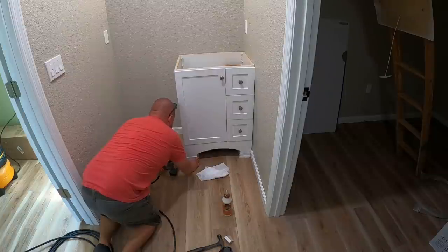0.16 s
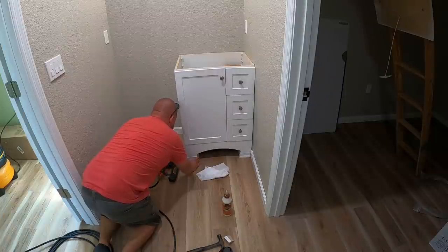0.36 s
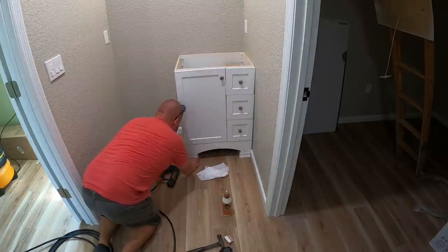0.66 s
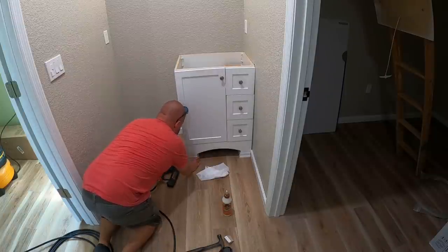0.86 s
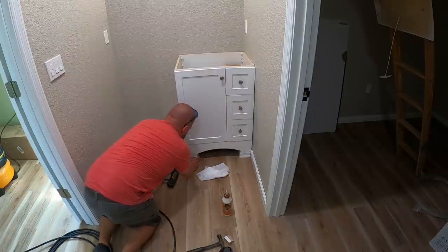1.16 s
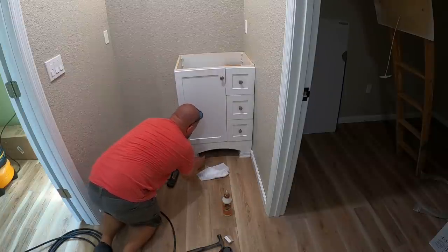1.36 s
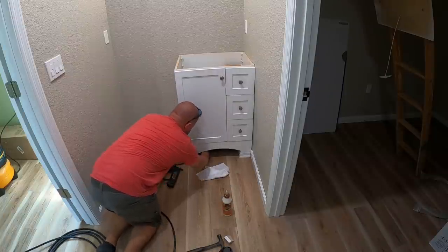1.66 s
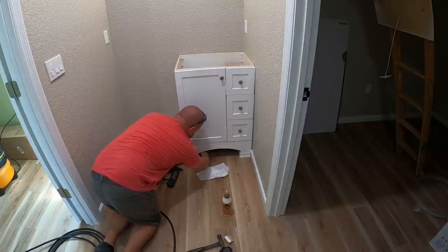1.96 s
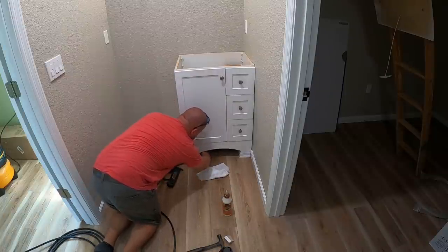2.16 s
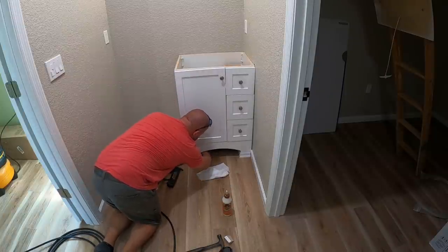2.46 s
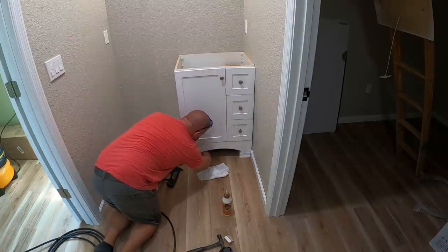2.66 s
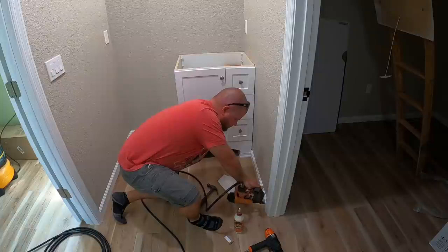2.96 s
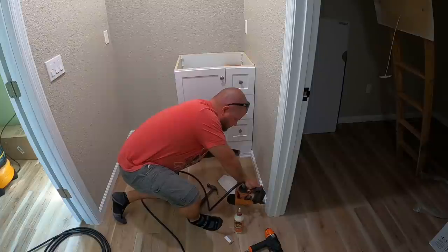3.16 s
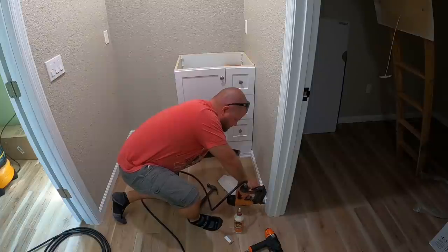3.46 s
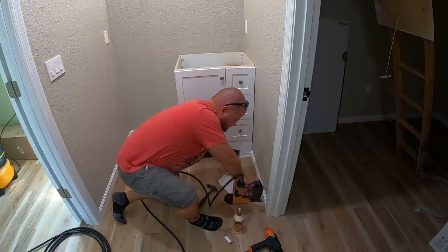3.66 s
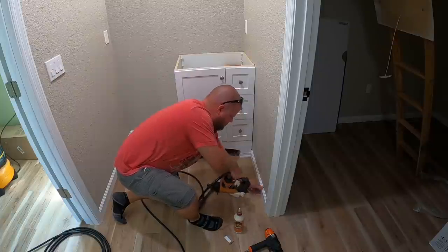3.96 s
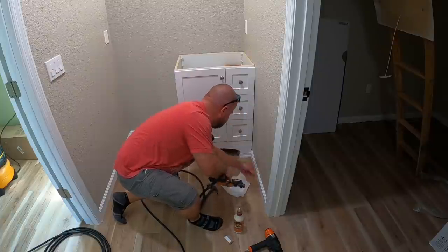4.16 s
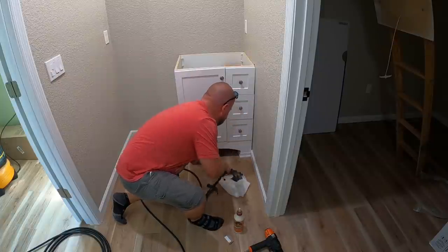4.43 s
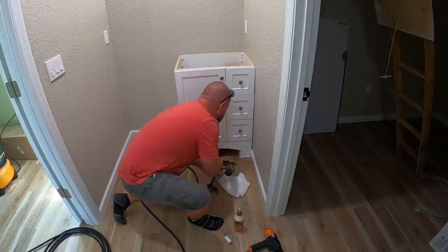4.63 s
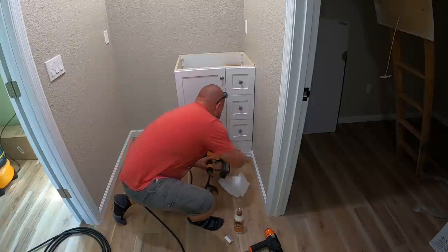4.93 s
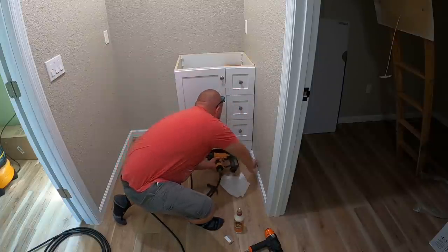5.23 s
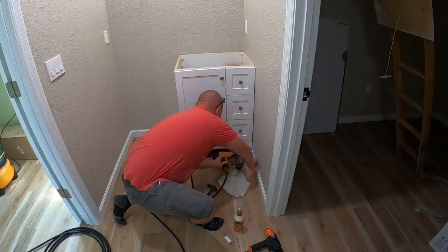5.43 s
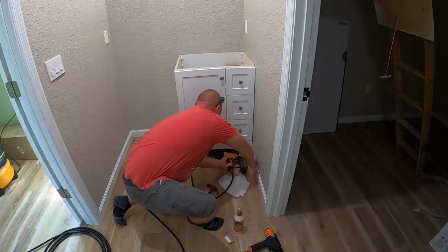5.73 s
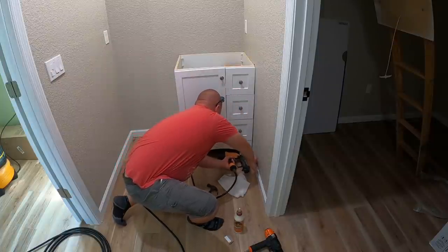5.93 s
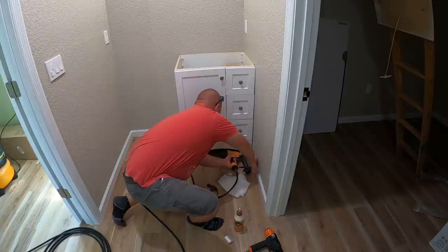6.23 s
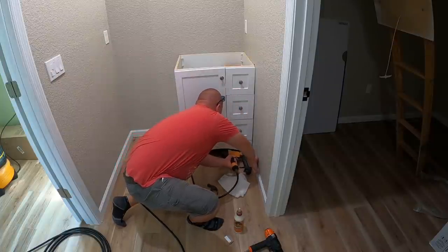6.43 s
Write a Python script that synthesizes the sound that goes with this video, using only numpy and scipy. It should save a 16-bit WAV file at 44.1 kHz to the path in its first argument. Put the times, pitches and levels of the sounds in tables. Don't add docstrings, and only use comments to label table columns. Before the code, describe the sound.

After an earlier shot's dying echo, trim rattles onto floorboards, faint rubbing and taps follow, then an air nailer bangs loudly with an exhaust hiss.

```python
import sys
import numpy as np
from scipy import signal
from scipy.fft import rfft, irfft
from scipy.io import wavfile
from scipy.ndimage import uniform_filter1d

SR = 44100
rng = np.random.default_rng(int(sys.argv[2]) if len(sys.argv) > 2 else 0)


def to_wav(s):
    ch = np.atleast_2d(s).T
    pcm = np.round(np.clip(ch, -1, 1) * 32767)
    wavfile.write(sys.argv[1], SR, pcm.astype(np.int16))


def gain_from_decibels(decibels):
    exponent = np.asarray(decibels, float) / 20
    return 10 ** exponent


N = 290619
LEAD = SR // 2
M = N + LEAD

# start_s, body_db, metal_db, crack_db, crack_t60_s
BLOWS = [
    (3.488, -42, -38.5, -28.5, 0.023),
    (3.5316, -18.5, -30, -16.5, 0.045),
    (3.555, -22, -16.5, -15.5, 0.22),
    (3.5599, -20, -30.5, -30, .03),
    (3.62, -34, -24, -28.5, .012),
    (3.641, -28, -28, -19.5, 0.025),
    (3.670, -26, -27, -23.5, 0.055),
]
# pitch_hz, level_db, t60_s
BODY_MODES = [(72, -9, 0.1), (100, -6, 0.12), (147, 0.5, 0.087), (178, 2, 0.09), (217, 0.5, 0.09),
              (297, -7, 0.15), (369, -14, 0.08), (403, -14.5, .08), (470, -13.5, .06), (557, -17.5, .05),
              (618, -15.5, 0.05), (693, -14, .06), (825, -11.5, 0.06), (964, -9, .06)]
# pitch_hz, level_db, t60_s
METAL_MODES = [(1254, -14, .05), (1703, -4.5, 0.068), (1990, -9, .03), (2223, -6, 0.06),
               (2293, -4.5, 0.036), (2700, -9.5, 0.045), (3660, -6, 0.036), (5000, -10.5, .015),
               (6270, -3.5, 0.026), (9200, -4.5, 0.013)]
# freq_hz, density_db
BLOW_CRACK = [(180, -31), (300, 3.5), (912, -6.5), (1340, -16.5), (1660, -8), (1800, -10), (2230, -4),
              (2640, -11.5), (6360, -11.5), (15800, -28)]
# freq_hz, density_db
JET = [(590, -32.5), (1000, -8.5), (1740, -16), (2190, -10), (2350, -14.5), (3250, -7.5), (3820, -3.5),
       (4390, -6.5), (9750, -8.5), (15800, -17)]
# pitch_hz, width_hz, level_db
PORTS = [(2220, 40, -5), (3920, 30, -1.5), (4710, 46, -2.5), (6370, 60, -10), (6970, 35, -6),
         (7860, 60, -8.5), (9100, 40, -12), (10200, 90, -9.5)]
# start_s, level_db, rise_s, hold_s, t60_s
INLET = [
    (3.486, -43, .002, 0.0045, 0.069),
    (3.523, -20.5, 0.011, 0.0043, 0.043),
    (3.543, -32.5, 0.0069, 0.012, 0.034),
]
# start_s, level_db, rise_s, hold_s, t60_s
EXHAUST = [
    (3.637, -21.5, 0.0036, 0.028, 0.089),
    (3.677, -29, 0.0036, 0.012, 0.42),
]
INLET_WHISTLE_DB, EXHAUST_WHISTLE_DB = -11.5, 3
EARLIER_S, EARLIER_DB, EARLIER_BODY_DB, EARLIER_PORTS_DB = 3.8, -1.5, -9, -12.5

# start_s, peak_db, ring_hz, crack_over_ring_db
STRIP_KNOCKS = [(0.355, -11, 916, 0.5), (0.362, -9.5, 796, -0.5), (0.383, -37, 790, 0),
                (0.409, -15.5, 899, 1), (0.415, -19.5, 870, 0), (0.444, -18, 832, -1),
                (0.457, -24.5, 850, -3), (0.47, -27, 880, -2), (0.501, -31, 840, -9), (.515, -36, 830, -4),
                (0.529, -31, 824, -2), (0.555, -35.5, 710, 5), (0.598, -26, 1107, 2.5),
                (0.6125, -23.5, 865, 0), (0.616, -20, 800, 2), (0.63, -34, 905, -10), (.647, -40, 910, 7),
                (0.663, -35, 872, -2), (0.678, -32, 814, -2), (.695, -36, 900, 1), (0.716, -29, 890, -7),
                (.74, -39, 840, 0), (0.779, -28.5, 862, -9), (6.385, -24, 868, -13), (6.398, -34, 610, -4)]
# start_s, peak_db, ring_hz, crack_over_ring_db
TAPS = [(1.074, -42, 557, -8), (1.185, -53.5, 570, -20), (1.253, -46, 580, -20), (1.277, -50, 570, -18),
        (1.39, -47.5, 957, -13.5), (1.623, -38, 470, -26.5), (1.638, -45, 446, -18), (1.652, -46, 523, -20),
        (1.713, -41, 525, -20), (1.726, -44.5, 527, -20), (2.074, -53.5, 519, -13.5),
        (2.245, -48.5, 540, -12), (2.26, -41.5, 521, -9), (2.86, -59.5, 576, -6), (3.03, -65.5, 932, -16),
        (3.15, -62.5, 600, -8), (3.376, -55, 338.6, -9), (3.488, -29.5, 523, -15),
        (4.712, -49.5, 900, -5.5), (4.76, -47.5, 595, -13), (4.809, -44, 910, -13),
        (4.859, -46, 926, -12.5), (4.913, -39, 978, -9.5), (5.492, -57.5, 491, -13), (5.953, -44, 800, -20),
        (5.955, -48.5, 518, -23.5), (6.419, -46, 873, -12), (6.454, -43, 788, -10),
        (6.571, -52.5, 980, -10)]
# ratio_to_ring, level_db
WOOD_MODES = [(.36, -21.5), (.56, -7.5), (0.72, -11.5), (0.881, -3), (0.998, 3), (1.13, -3), (1.271, -17),
              (1.9, -10.5), (2.02, -9), (2.3, -11), (2.9, -13.5)]
# start_s, peak_db, pitch_hz, t60_s
THUMPS = [
    (-0.054, -29, 78, 0.37),
    (-.05, -39.5, 128.7, 0.32),
    (1.623, -41.5, 149.6, 0.26),
    (3.197, -59, 205, .06),
    (3.641, -24.5, 78.4, 0.098),
    (4.109, -55.5, 164, 0.15),
    (5.266, -39, 193.5, 0.13),
    (5.954, -46, 177, 0.08),
    (6.386, -55, 167, 0.32),
]
# start_s, peak_db, centre_hz
TICKS = [(1.076, -61, 6950), (1.3023, -36.5, 4200), (1.384, -41, 4800), (1.388, -51, 9000),
         (1.393, -44, 6500), (1.8944, -62, 11500), (2.4294, -63.5, 10500), (2.858, -66, 2140),
         (3.1497, -58.5, 2103), (3.22, -62, 2350), (3.309, -68.5, 4200), (3.376, -57.5, 3200),
         (5.2696, -56, 4610), (5.4298, -56.5, 2487)]

# peak_s, rise_s, fall_s, swish_db, dull_over_swish_db
DRAGS = [(0.699, .08, 0.14, -59, 8.5), (.95, 0.16, 0.06, -62.5, -17), (1.2, 0.063, 0.28, -63, -0.5),
         (1.38, 0.13, 0.079, -59.5, -6.5), (1.69, 0.16, 0.14, -54, -8), (2.1, 0.26, 0.17, -67.5, -5.5),
         (2.45, 0.18, 0.11, -71, -10), (2.75, 0.14, 0.046, -75, -9), (4.33, .2, 0.27, -61, -11.5),
         (4.58, .12, 0.16, -70, 4.5), (4.73, 0.089, 0.119, -60.5, 1), (4.9, 0.19, 0.13, -55.5, 2.5),
         (5.13, 0.2, 0.091, -61.5, -3), (5.45, 0.37, 0.088, -71, -1), (5.8, 0.3, 0.17, -76, -2.5),
         (6.07, 0.078, 0.083, -65, -4), (6.52, 0.037, 0.35, -77, 6)]
# freq_hz, density_db
RUB_DULL = [(150, -53.5), (250, -26.5), (429, -13.5), (493, -0.5), (795, -4), (988, -2.5), (2000, -10),
            (2600, -27.5), (4400, -120)]
# freq_hz, density_db
RUB_BRIGHT = [(760, -27), (1300, -10.5), (2070, -4.5), (2300, -1), (2820, -3), (4040, -0.5), (4990, -3),
              (5510, -3.5), (8000, -9), (10400, -32), (17600, -120)]
# freq_hz, density_db
RUB_TOP = [(4120, -26.5), (7000, -6.5), (8920, 1), (11100, -3.5), (13800, -7), (15800, -17.5)]
STROKE_ROUND, TOP_DB, TOP_PER_WEIGHT = 1.4, -10, -0.077
LEAK_S, LEAK_DB, LEAK_T60_S, LEAK_DULL_DB, LEAK_TOP_DB = 3.88, -51.5, 2.65, -4.5, -17.5
LEAK_HZ, LEAK_WIDTH_HZ, LEAK_RING_DB = 3960, 1100, -2

# time_s, pitch_hz, level_db
SLIDES = [
    [(1.13, 6600, -90), (1.17, 8200, -81), (1.21, 8900, -80), (1.26, 10100, -76), (1.3, 9000, -78),
     (1.33, 8200, -92)],
    [(1.11, 6200, -90), (1.17, 12500, -82), (1.23, 14900, -81), (1.3, 15500, -82), (1.345, 13500, -81),
     (1.39, 14300, -88)],
    [(1.385, 11700, -90), (1.41, 11200, -80), (1.47, 10300, -78), (1.52, 11300, -81), (1.56, 12600, -92)],
    [(1.5, 8500, -90), (1.53, 9400, -78), (1.6, 12300, -79), (1.65, 13200, -79), (1.7, 14500, -76),
     (1.75, 13300, -79), (1.83, 8800, -81), (1.86, 7500, -92)],
    [(4.96, 10300, -95), (5.0, 9900, -80), (5.1, 9800, -79), (5.17, 10000, -81), (5.23, 7000, -86)],
    [(5.32, 10900, -96), (5.43, 11900, -87), (5.5, 10000, -95)],
    [(6.49, 10000, -95), (6.59, 12000, -90)],
]
# pitch_ratio, level_db
THREADS = [
    [(.82, -5), (1, 2), (1.4, -3)],
    [(1, 0)],
    [(.8, -4), (1, 0), (1.14, -2), (1.26, 1)],
    [(.72, -7), (.87, -4), (1, 2), (1.3, -5)],
    [(.83, -4), (1, 2), (1.17, -5), (1.35, -1)],
    [(.9, -4), (1, 1)],
    [(.85, -4), (1, 1), (1.1, -3)],
]
# start_s, stop_s, start_db, stop_db
HOSE_PULLS = [
    (0.797, 1.005, -70, -71),
    (2.003, 2.801, -77, -81.5),
    (4.898, 5.203, -58.5, -65),
    (5.217, 5.503, -77, -82.5),
    (5.741, 6.142, -84.5, -82.5),
    (6.493, 6.598, -73.5, -70.5),
]
# pitch_hz, width_hz, level_db
HOSE_WALL = [(2350, 73, 0), (3100, 59, 1.5), (3550, 33, -3.5), (4200, 58, -7), (4700, 51, 2)]
HOSE_START_S, HOSE_STOP_S = 0.041, 0.012
# time_s, pitch_hz, level_db
GROAN = [(1.92, 154, -82), (1.955, 143.4, -64.5), (2.02, 143.6, -67), (2.07, 142, -59), (2.11, 140, -70),
         (2.16, 138, -61), (2.21, 138.3, -66), (2.256, 142, -56), (2.315, 133, -72), (2.35, 128.4, -91)]

# freq_hz, density_db
RUMBLE = [(15, -55.5), (25, -27), (43, -7.5), (70, -2), (91, -0.5), (114, -9.5), (162, -0.5), (194, -8.5),
          (253, -14), (303, -4), (390, -13), (424, -12), (584, -14.5), (700, -31), (910, -58.5),
          (1540, -120)]
# time_s, level_db
RUMBLE_LEVEL = [(0.3, -68), (1.2, -68), (2.1, -63), (3.2, -69.5), (4.2, -74.5), (5.1, -65), (5.7, -68.5),
                (6.59, -70)]
# peak_s, level_db
SHUDDERS = [
    (0.0, -43.5),
    (.6, -60),
    (3.66, -52),
]
SHUDDER_RISE_S, SHUDDER_FALL_S = 0.09, 0.049
# freq_hz, density_db
HISS = [(240, -29), (400, -2.5), (536, -8.5), (635, -6.5), (707, -8.5), (1010, -9.5), (1230, -18),
        (4410, -22), (15800, -32.5)]
HISS_DB = -76.5

# freq_hz, t60_s
CLOSET_T60 = [(50, 0.45), (200, 0.25), (700, 0.4), (2000, .4), (5000, 0.38), (12000, 0.09)]
# freq_hz, level_db
CLOSET_COLOUR = [(50, -6), (250, -4.5), (500, -1.5), (1000, -0.5), (12000, 0)]
# freq_hz, t60_s
HALL_T60 = [(50, 0.91), (200, 0.2), (700, 1.364), (2000, 1.4), (4000, 1.6), (7000, 1.2), (12000, 0.23)]
# freq_hz, level_db
HALL_COLOUR = [(50, -3.5), (250, -1.5), (600, 2), (1250, -2), (1800, 1), (2800, -8), (4000, 1),
               (6000, -0.5), (12000, 0)]
ECHO_EDGES_HZ = 22 * 2 ** np.arange(0, 9.6, .5)


def shot(shift_s, level_db, body_shift_db, ports_db):
    out, t = np.zeros(M), np.arange(SR // 3) / SR
    for s, body_db, metal_db, crack_db, crack_t60 in BLOWS:
        body = [(hz, db + body_db + body_shift_db + rng.normal(0, 2.1), t60) for hz, db, t60 in BODY_MODES]
        metal = [(hz, db + metal_db + rng.normal(0, 2.1), t60) for hz, db, t60 in METAL_MODES]
        crack = gain_from_decibels(crack_db - 60 * t / crack_t60) * coloured(BLOW_CRACK, len(t))
        add(out, s - shift_s, modes(body, soft_s=0.0015) + modes(metal, soft_s=0.000058) + crack)
    for puffs, whistle_db in [(INLET, INLET_WHISTLE_DB), (EXHAUST, EXHAUST_WHISTLE_DB)]:
        for s, db, rise, hold, t60 in puffs:
            add(out, s - shift_s, gain_from_decibels(db) * air_puff(t, rise, hold, t60, whistle_db + ports_db))
    return gain_from_decibels(level_db) * out


def air_puff(t, rise, hold, t60, whistle_db):
    jet = coloured(JET, len(t))
    whistle = sum(gain_from_decibels(db) * resonate(jet, hz, 5 * width) for hz, width, db in PORTS)
    shape = np.minimum(t / rise, 1) ** 2 * gain_from_decibels(-60 * np.maximum(t - rise - hold, 0) / t60)
    return shape * rms_one(jet + gain_from_decibels(whistle_db) * whistle)


def knocks(rows, chatter_s, t60, bright, bright_per_db, upper_db, crack_t60):
    out, t = np.zeros(M), np.arange(SR // 8) / SR
    luck = rng.standard_normal((len(rows), 3, len(WOOD_MODES)))
    grit = filtered(rng.standard_normal((len(rows), len(t))), 1250, "high")
    for (s, db, hz, crack_db), (loud, tune, late), noise in zip(rows, luck, grit):
        for (ratio, mode_db), a, b, c in zip(WOOD_MODES, loud, tune, late):
            level_db = db - 4.5 + mode_db + 1.5 * a
            level_db += (upper_db + 0.92 * crack_db) * (ratio > 1.5)
            mode = (hz * ratio * (1 + 0.029 * b), level_db, t60 / ratio ** 0.24)
            add(out, s - chatter_s * (1 - abs(c)), modes([mode], soft_s=1.1 * chatter_s))
        edge_hz = 1000 * 2 ** np.clip(bright + bright_per_db * db, 0, 4)
        slow = filtered(noise, min(.6 * edge_hz, 17000), "low")
        fast = filtered(noise, min(1.6 * edge_hz, 17000), "low")
        crack = gain_from_decibels(-60 * t / crack_t60) * slow + gain_from_decibels(-12 - 60 * t / (.35 * crack_t60)) * fast
        onset = np.minimum(t / (2 * chatter_s), 1)
        add(out, s - chatter_s, gain_from_decibels(db + crack_db + 1.5) * onset * crack)
    return out


def thumps():
    out = np.zeros(M)
    for s, db, hz, t60 in THUMPS:
        rows = [(hz, db, t60), (1.25 * hz, db - 6.5, t60), (1.9 * hz, db - 6.0, .5 * t60)]
        add(out, s, modes(rows, soft_s=0.0049))
    return out


def ticks():
    out, t = np.zeros(M), np.arange(SR // 20) / SR
    for s, db, hz in TICKS:
        snap = rms_one(resonate(rng.standard_normal(len(t)), hz, 0.33 * hz))
        add(out, s, gain_from_decibels(db - 7.0 - 60 * t / 0.02) * snap)
    return out


def cloth_and_leak():
    peak, rise, fall, db, weight = np.transpose(DRAGS)
    since = clock() - LEAK_S
    leak = gain_from_decibels(LEAK_DB - 60 * since / LEAK_T60_S) * np.clip(since / 0.059 + 1, 0, 1)
    port = resonate(rng.standard_normal(M), LEAK_HZ, LEAK_WIDTH_HZ)
    out = gain_from_decibels(LEAK_RING_DB) * leak * rms_one(resonate(port, LEAK_HZ, 2 * LEAK_WIDTH_HZ))
    layers = [(RUB_DULL, weight, LEAK_DULL_DB), (RUB_BRIGHT, 0, 0),
              (RUB_TOP, TOP_DB + TOP_PER_WEIGHT * weight, LEAK_TOP_DB)]
    for colour, extra_db, leak_db in layers:
        strokes = humps(peak, rise, fall, db + extra_db, STROKE_ROUND)
        level = np.hypot(strokes, gain_from_decibels(leak_db) * leak)
        out = out + level * gain_from_decibels(1.2 * drift(45)) * coloured(colour, M)
    return out


def thread_whistles():
    return sum(gain_from_decibels(db) * tone(rows, ratio, wobble=.005, flutter_db=3)
               for rows, threads in zip(SLIDES, THREADS) for ratio, db in threads)


def hose():
    white, t = rng.standard_normal(M), clock()
    scuff, pulls = np.zeros(M), np.zeros(M)
    for hz, width, db in HOSE_WALL:
        ring = resonate(resonate(white, hz, 4.2 * width), hz, 4.2 * width)
        scuff += gain_from_decibels(db) * ring / np.sqrt(width)
    for start, stop, start_db, stop_db in HOSE_PULLS:
        fade = np.minimum((t - start) / HOSE_START_S, (stop - t) / HOSE_STOP_S) + 1
        pulls += gain_from_decibels(np.interp(t, [start, stop], [start_db, stop_db])) * np.clip(fade, 0, 1)
    return pulls * gain_from_decibels(0.98 * drift(41)) * rms_one(scuff)


def groan():
    return tone(GROAN, 1.0, wobble=0.011, flutter_db=-0.5)


def rumble():
    peak, db = np.transpose(SHUDDERS)
    shaken = humps(peak, SHUDDER_RISE_S, SHUDDER_FALL_S, db, roundness=1.2)
    return np.hypot(gain_from_decibels(np.interp(clock(), *np.transpose(RUMBLE_LEVEL))), shaken) * coloured(RUMBLE, M)


def hiss():
    return gain_from_decibels(HISS_DB) * coloured(HISS, M)


def room(x):
    t = np.arange(int(1.8 * SR)) / SR
    white, echo = rng.standard_normal((2, len(t))), 0
    for k, (low, high) in enumerate(zip(ECHO_EDGES_HZ, ECHO_EDGES_HZ[1:])):
        hz = np.sqrt(low * high)
        band = filtered(white[k % 2], [low, high], "band")
        near = gain_from_decibels(-37.5 + at_hz(CLOSET_COLOUR, hz) - 60 * t / at_hz(CLOSET_T60, hz))
        far = gain_from_decibels(-47.5 + at_hz(HALL_COLOUR, hz) - 60 * t / at_hz(HALL_T60, hz))
        echo = echo + band * np.hypot(near * np.minimum(t / 0.002, 1), far * np.minimum(t / 0.025, 1))
    return signal.fftconvolve(x, echo)[:M]


def modes(rows, soft_s):
    t = np.arange(SR // 3) / SR
    hz, level_db, t60 = (c[:, None] for c in np.transpose(rows))
    rings = gain_from_decibels(level_db - 60 * t / t60) * np.sin(2 * np.pi * hz * t)
    return rings.sum(0) * (1 - np.exp(-t / soft_s))


def tone(rows, ratio, wobble, flutter_db):
    s, hz, db = np.transpose(rows)
    out, t = np.zeros(M), np.arange(s[0], s[-1], 1 / SR)
    chance = rng.standard_normal((2, 200))
    wander, flutter = (np.interp((t - s[0]) * 120, np.arange(200), c) for c in chance)
    glide = uniform_filter1d(np.interp(t, s, hz), size=1500, mode="nearest")
    pitch = ratio * glide * (1 + wobble * wander)
    level = gain_from_decibels(np.interp(t, s, db) + flutter_db * flutter) * (pitch < 15600)
    add(out, s[0], np.sqrt(2) * level * np.sin(2 * np.pi * np.cumsum(pitch) / SR))
    return out


def humps(peak_s, rise_s, fall_s, db, roundness):
    peak, rise, fall, db = (np.reshape(v, (-1, 1)) for v in (peak_s, rise_s, fall_s, db))
    coarse = clock()[::64]
    t = coarse - peak
    far = np.where(t < 0, -t / rise, t / fall)
    gain = np.sqrt((gain_from_decibels(db - 10 * far ** roundness) ** 2).sum(0))
    return np.interp(clock(), coarse, gain)


def coloured(spectrum, size):
    hz = np.maximum(np.fft.rfftfreq(size, 1 / SR), 1)
    return rms_one(irfft(rfft(rng.standard_normal(size)) * gain_from_decibels(at_hz(spectrum, hz)), size))


def resonate(x, hz, width):
    r = np.exp(-np.pi * width / SR)
    poles = [1, -2 * r * np.cos(2 * np.pi * hz / SR), r * r]
    return signal.lfilter((1 - r * r) / 2 * np.array([1, 0, -1]), poles, x)


def filtered(x, hz, kind):
    return signal.sosfilt(signal.butter(2, hz, kind, fs=SR, output="sos"), x)


def drift(rate_hz):
    knots = rng.standard_normal(int(M / SR * 60) + 2)
    return np.interp(np.arange(M) / SR * np.clip(rate_hz, .1, 59), np.arange(len(knots)), knots)


def at_hz(points, hz):
    table_hz, value = np.transpose(points)
    return np.interp(np.log(hz), np.log(table_hz), value)


def rms_one(x):
    return x / np.sqrt(np.mean(x ** 2) + 1e-30)


def clock():
    return (np.arange(M) - LEAD) / SR


def add(track, s, sound):
    i = LEAD + round(s * SR)
    track[i:i + len(sound)] += sound[:M - i]


def scene():
    shots = shot(0, 0, 0, 0) + shot(EARLIER_S, EARLIER_DB, EARLIER_BODY_DB, EARLIER_PORTS_DB)
    strip = knocks(STRIP_KNOCKS, chatter_s=.001, t60=.03, bright=2.844, bright_per_db=0.04,
                   upper_db=1.0, crack_t60=.065)
    taps = knocks(TAPS, chatter_s=0.0009, t60=0.054, bright=1.8, bright_per_db=-0.34,
                  upper_db=-5.5, crack_t60=.06)
    hits = shots + strip + taps + thumps() + ticks()
    rubs = cloth_and_leak() + thread_whistles() + hose()
    mono = (hits + room(hits) + rubs + groan() + rumble() + hiss())[LEAD:]
    return np.array([mono, mono])


def low_pass(x):
    return signal.sosfilt(signal.butter(12, 15830, fs=SR, output="sos"), x)


def record(dry):
    x = filtered(dry, 45, "high")
    x = x / (1 + (np.abs(x) / .37) ** 4) ** .25
    level = np.sqrt(uniform_filter1d(x[0] ** 2, size=512) + 1e-14)
    grain_colour = [(30, -2.5), (150, 1.0), (350, 10), (1000, -4.0), (5000, -1.5), (10000, 0.0), (16000, -1.5)]
    grain = gain_from_decibels(-32.5) * level * coloured(grain_colour, N)
    x = x + grain * [[1], [-1]]
    mix = signal.sosfilt(signal.cheby2(16, 60, 16000, fs=SR, output="sos"), x)
    return low_pass(mix)


dry = scene()
out = record(dry)
to_wav(out)
```